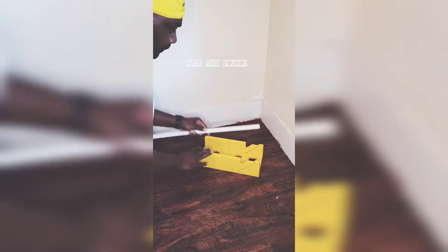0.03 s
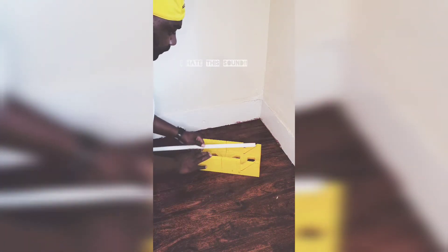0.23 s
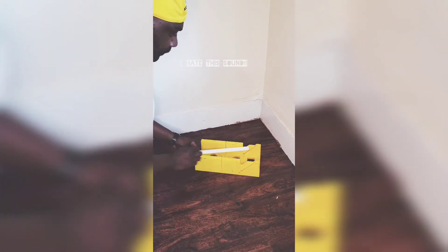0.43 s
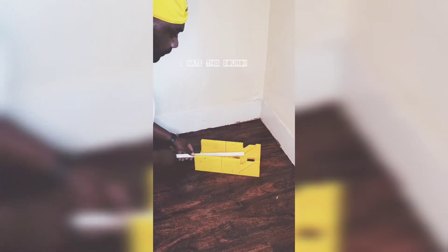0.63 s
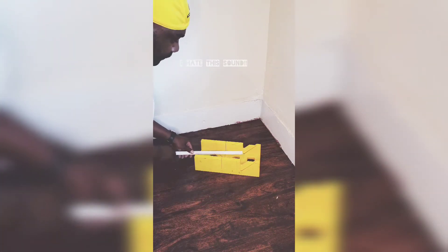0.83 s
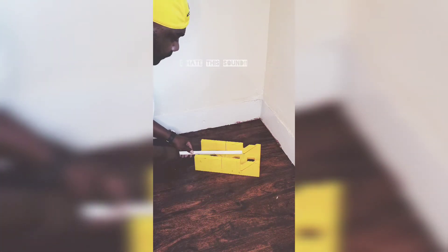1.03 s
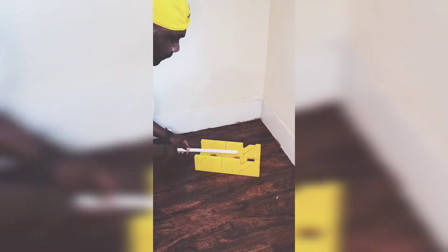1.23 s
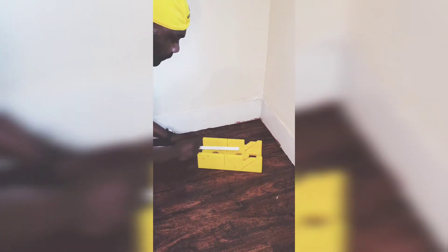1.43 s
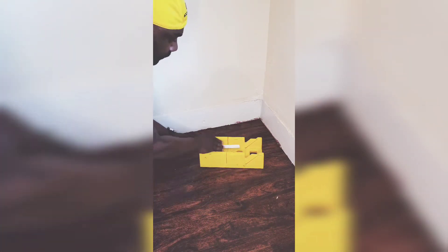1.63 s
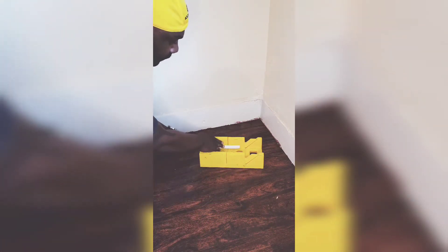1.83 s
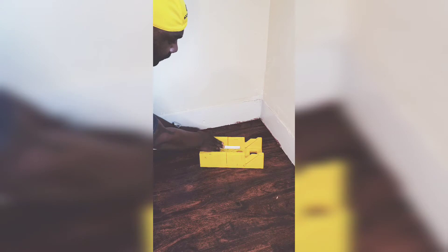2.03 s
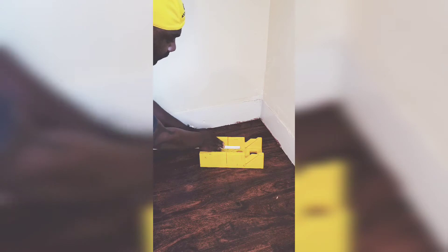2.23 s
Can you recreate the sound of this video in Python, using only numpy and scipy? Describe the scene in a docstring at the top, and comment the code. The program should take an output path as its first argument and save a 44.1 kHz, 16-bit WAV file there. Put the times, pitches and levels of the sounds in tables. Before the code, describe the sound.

Hand saw cutting trim in a hollow plastic box: ringing rasp, low judder, knocks, second rasping stroke

```python
"""A hand saw works through trim in a plastic miter box, on the floor of a bare room with a mains hum.
The first stroke hisses and rasps as shaped noise; the blade rings in its modes and squeals in pure tones.
As it slows the box judders low on the floor; meanwhile and shortly after, knocks of the blade in its slot,
as noise bursts, ring the box. A long stroke follows, ringing the blade in another, broader set of modes,
and a short faint scrape ends the scene. Hum harmonics and soft air noise run throughout."""
import sys
import numpy as np
from scipy import signal
from scipy.fft import rfft, irfft
from scipy.io import wavfile

SR = 44100
rng = np.random.default_rng(int(sys.argv[2]) if len(sys.argv) > 2 else 0)


def store_pcm(level_fs):
    """Save levels as 16-bit WAV."""
    pcm = np.round(np.clip(level_fs, -1, 1) * 32767).astype(np.int16)
    wavfile.write(sys.argv[1], SR, np.atleast_2d(pcm).T)


N = 100812

# Speed of the blade, as the level of its hiss. Each row: time in seconds, relative level in dB.
BLADE_SPEED = [(0.0, -56), (0.03, -57), (0.08, -47.5), (0.09, -50), (0.18, -45.5), (0.33, -44),
               (0.52, -59.5), (0.6, -54), (1.06, -83), (1.14, -64), (1.21, -60.5), (1.29, -67),
               (1.39, -49.5), (1.53, -46.5), (1.84, -74.5), (2.12, -82.5), (2.19, -59.5), (2.29, -58.5)]
# How hard the teeth bite, as the rasp in the box. Each row: time in seconds, relative level in dB.
BITE_LEVEL = [(0, -36.5), (.11, -41.5), (.19, -34.5), (.34, -33.5), (.46, -44.5), (.55, -41), (.63, -41.5),
              (.72, -43.5), (.86, -40), (1.05, -55), (1.17, -43), (1.29, -45.5), (1.38, -39.5), (1.5, -38),
              (1.58, -52), (1.67, -44.5), (1.82, -54.5), (1.94, -50.5), (2, -62.5), (2.13, -65),
              (2.19, -47), (2.29, -62)]
# Wood tearing under the teeth. Each row: time in seconds, relative level in dB.
TEAR_LEVEL = [(0, -38.5), (.2, -36), (.34, -35.5), (.5, -42), (.64, -40), (.76, -48.5), (1.06, -61),
              (1.14, -45.5), (1.29, -50.5), (1.34, -38.5), (1.45, -34.5), (1.51, -31), (1.57, -33.5),
              (1.65, -42.5), (1.74, -45), (1.84, -52.5), (2.12, -64), (2.18, -44.5), (2.29, -50)]
# Hollow ringing of the box under the saw. Each row: time in seconds, relative level in dB.
HOLLOW_LEVEL = [(0, -54), (.12, -44), (.23, -38.5), (.34, -43.5), (.48, -50), (.64, -42.5), (.76, -65),
                (.88, -49), (1.08, -58), (1.3, -57), (1.39, -41), (1.46, -37), (1.49, -30.5), (1.53, -32),
                (1.6, -39), (1.65, -46.5), (1.72, -45.5), (1.79, -54.5), (1.9, -62), (1.94, -47),
                (2.02, -65.5), (2.14, -63), (2.2, -54.5), (2.29, -63)]
# Rumble the strokes send into the floor. Each row: time in seconds, relative level in dB.
RUMBLE_LEVEL = [(0, -44), (.12, -42.5), (.2, -52), (.36, -45), (.5, -46.5), (.9, -61), (1.1, -58),
                (1.3, -62), (1.4, -51), (1.51, -43), (1.67, -44), (1.8, -58), (2.29, -60)]
# Ringing of the blade on the first stroke. Each row: time in seconds, relative level in dB.
FIRST_RING_LEVEL = [(0, -62), (.03, -27), (.06, -22.5), (.1, -27), (.14, -24.5), (.19, -26.5), (.26, -27),
                    (.33, -28.5), (.37, -36.5), (.48, -45), (.6, -51), (.9, -72)]
# Ringing of the blade on the long stroke. Each row: time in seconds, relative level in dB.
LONG_RING_LEVEL = [(1.28, -70), (1.332, -33.5), (1.4, -41), (1.46, -40), (1.5, -31), (1.56, -42.5),
                   (1.63, -53), (1.75, -69), (1.95, -99)]

# Modes of the blade on the first stroke. Each row: frequency in Hz, width in Hz, relative level in dB,
# time it takes hold in seconds, time it lets go in seconds.
FIRST_BLADE_MODES = [(2507, 18, -8, 0.036, 0.23), (2742, 12, -3.5, .04, 0.21), (2809, 19, 1.5, 0.13, 0.17),
                     (2926, 87, -3.5, 0.034, 0.3), (3142, 12, -2.5, 0.063, 0.29),
                     (3168, 27, 0.5, 0.046, 0.44), (3550, 7.5, -3.5, 0.086, 0.3), (3668, 8.2, -2, .16, .43),
                     (3667, 36, -9.5, 0.12, 0.36)]
# Broader modes of the blade on the long stroke. Each row: frequency in Hz, width in Hz,
# relative level in dB, time it takes hold in seconds, time it lets go in seconds.
LONG_BLADE_MODES = [(2502, 54, 1.5, 1.32, 1.4), (2814, 45, -0.5, 1.38, 1.44), (2850, 50, -3, 1.35, 1.58),
                    (3553, 45, 4.5, 1.48, 1.52), (3760, 39, -10, 1.6, 1.8)]
# Modes of the plastic box. Each row: frequency in Hz, width in Hz, relative level when sawn in dB,
# relative level when knocked in dB.
BOX_MODES = [(753, 24, -7, -7.5), (855.4, 27, -2, -20), (939.7, 38, 0.5, 1), (1004, 18, -8.5, 0.5),
             (1093, 40, -7, 2), (1270, 19.3, -2.5, 2), (1545, 58, -9, -12)]

# Squeals, where one blade mode takes over. Each row: middle in seconds, half length in seconds,
# frequency in Hz, level in dB, right ear against left in dB.
SQUEALS = [(0.061, .005, 3195, -23.5, -9), (0.0827, 0.0068, 3155, -6.5, -17.5),
           (0.115, 0.017, 3150, -16.5, -13.5), (0.187, 0.0041, 3675, -21, -4.5)]
# Knocks of the blade in its slot. Each row: start in seconds, relative level in dB, treble tilt in dB,
# decay time in seconds, relative level of the box ring in dB.
KNOCKS = [(0.594, -25, -3, 0.0084, -38.5), (.619, -40, -50, 0.0037, -36.5), (0.791, -29, 1, 0.014, -39.5),
          (1.208, -36, 0, .012, -36.5)]
# Low judder of the box on the floor. Each row: time in seconds, pitch in Hz, level in dB.
JUDDER = [(.48, 138, -110), (.53, 133, -62), (.57, 127, -41), (.61, 113.5, -37.5), (.645, 115, -34),
          (.68, 109, -33), (.712, 101, -49), (.74, 96, -37), (.785, 92, -51), (.84, 92, -110)]
# Harmonics of the hum. Each row: multiple of the mains pitch, level in dB.
HUM = [(1, -42), (2, -59), (3, -63), (4, -65), (5, -68), (6, -66), (7, -62)]

# Colour of the hiss. Each row: frequency in Hz, relative level in dB per Hz.
HISS_COLOUR = [(300, -21.5), (2000, -14), (4200, -22.5), (5200, 1.5), (6600, 10), (7400, 6.5), (8200, 2),
               (10000, 5), (12000, 7), (14000, 2.5), (16000, 4.5)]
# Colour of the tearing wood. Each row: frequency in Hz, relative level in dB per Hz.
WOOD_COLOUR = [(1000, -24), (2000, -9), (2300, -7.5), (2460, -4), (2650, -9.5), (2870, -3.5), (3200, -10),
               (3570, -7), (3900, -11.5), (4700, -13.5), (6500, -16.5), (9000, -32.5)]
# Colour of the rasp in the box. Each row: frequency in Hz, relative level in dB per Hz.
BOX_COLOUR = [(60, -13), (140, -9), (220, -8), (330, -5.5), (430, -4.5), (590, -4), (700, -1), (860, 1),
              (1050, -2), (1270, -4.5), (1400, -5), (1570, -2), (1850, -8), (2400, -15), (5000, -41.5)]
# Colour of the floor rumble. Each row: frequency in Hz, relative level in dB per Hz.
FLOOR_COLOUR = [(25, -30.5), (55, 18), (110, 5.5), (160, -2.5), (250, -8.5), (600, -44.5)]
# Colour of a knock before its treble tilt. Each row: frequency in Hz, relative level in dB per Hz.
KNOCK_COLOUR = [(80, -15.5), (300, -10.5), (650, -11.5), (1020, 0), (1170, -10.5), (1275, -4.5), (1400, 0),
                (1560, -2.5), (1900, -6), (2600, -4), (3300, -7.5), (4200, -14), (6000, -25.5), (9000, -40),
                (16000, -48)]
# Colour of the air of the room. Each row: frequency in Hz, relative level in dB per Hz.
AIR_COLOUR = [(20, -15.5), (45, -9), (90, -8), (150, -6), (300, -8), (600, -10.5), (1200, -14.5),
              (2500, -22.5), (5000, -38.5), (9000, -43), (16000, -54)]
# Decay of the room. Each row: frequency in Hz, time to fall by 60 dB in seconds.
ROOM_DECAY = [(100, 1), (400, 0.84), (1000, 0.58), (2800, 0.79), (6000, 0.7), (14000, 0.24)]

# Teeth: nominal rate at top speed, decay of one catch, spread of the catches, share of scraping, chatter
TEETH_PER_S, TOOTH_S, TOOTH_SPREAD_DB = 520, 0.00059, 3
SCRAPE_SHARE, CHATTER_DB = 0.74, 1.25
# Ringing: how fast blade modes take hold and let go, width of the skirt around each box mode
TAKE_HOLD_S, LET_GO_DB_PER_S, BOX_SKIRT_HZ = 0.0041, 73, 298
# Squeals: overtone level, wobble as a share of the pitch, echo level
OVERTONE_DB, SQUEAL_WOBBLE, SQUEAL_ECHO_DB = -25.5, 0.0067, -20
# Knocks: onset time of the box ring, corner of the treble tilt
KNOCK_RING_S, KNOCK_TILT_HZ = 0.0029, 1900
# Mains pitch, and phase skews added on the left and taken off on the right
MAINS_HZ, HUM_SKEW_RAD, JUDDER_SKEW_RAD = 58.6, 0.02, 0.11
# Mix trims
HISS_DB, AIR_DB, TAIL_DB, KNOCK_ROOM_DB = 6, -55.5, -5, -1
# Room: build-up time of the tail; corner of the stereo spread; top of the band
EARLY_S, MONO_HZ, EDGE_HZ = 0.0023, 562, 15850


def sawing():
    """The teeth hiss, tear the wood, shake the box, ring the blade and rumble in the floor."""
    drive, shake = teeth(), teeth()
    hiss = colour(drive, HISS_COLOUR) * amp(curve(BLADE_SPEED) + HISS_DB)
    wood = colour(teeth(), WOOD_COLOUR) * amp(curve(TEAR_LEVEL) - 3)
    rasp = colour(drive, BOX_COLOUR) * amp(curve(BITE_LEVEL) - 3.5)
    hollow = box_ringing(shake) * amp(curve(HOLLOW_LEVEL))
    steel = blade(shake, FIRST_BLADE_MODES, FIRST_RING_LEVEL)
    steel = steel + blade(shake, LONG_BLADE_MODES, LONG_RING_LEVEL)
    lean_left = amp(np.array([[0.93], [-0.93]]))
    close = hiss + wood + rasp + (hollow + steel) * lean_left
    rumble = colour(rng.standard_normal((2, N)), FLOOR_COLOUR) * amp(curve(RUMBLE_LEVEL))
    return narrow_bass(close + amp(TAIL_DB) * room(close) + rumble) * amp(-1.78)


def teeth():
    """Each tooth catches with a short burst over steady scraping; faster blade, more teeth."""
    # a power below 1 turns the wide range of hiss level into a smaller range of speed
    speed = amp(curve(BLADE_SPEED) - curve(BLADE_SPEED).max()) ** .3
    teeth_passed = np.cumsum(TEETH_PER_S * speed * np.exp(.3 * drift(150))) / SR
    strikes = np.diff(np.floor(teeth_passed), prepend=0) > 0
    catches = strikes * amp(TOOTH_SPREAD_DB * np.clip(rng.standard_normal(N), -2, 2))
    bursts = unit(signal.lfilter([1], [1, -np.exp(-1 / (TOOTH_S * SR))], catches))
    envelope = SCRAPE_SHARE + (1 - SCRAPE_SHARE) * bursts
    return unit(envelope * amp(CHATTER_DB * drift(44))) * rng.standard_normal((2, N))


def blade(drive, modes, level):
    """The rubbed steel rings in its modes, each taking hold and letting go at its own time."""
    t, out = np.arange(N) / SR, 0
    for hz, width_hz, db, start, end in modes:
        take_hold = (1 + np.tanh((t - start) / TAKE_HOLD_S)) / 2
        let_go = amp(-LET_GO_DB_PER_S * np.maximum(t - end, 0))
        out = out + amp(db) * unit(ring(drive, hz, width_hz)) * take_hold * let_go
    return out / np.linalg.norm(amp([row[2] for row in modes])) * amp(curve(level))


def box_ringing(drive):
    """The shaken plastic box rings in its modes, each narrow peak shaped by a wider one."""
    out = 0
    for hz, width_hz, sawn_db, _ in BOX_MODES:
        peak = ring(ring(drive, hz, width_hz), hz, BOX_SKIRT_HZ)
        out = out + amp(sawn_db) * unit(peak)
    return unit(out)


def squeals():
    """The blade sticks and slips at one mode: a nearly pure tone swells and fades."""
    t, out = np.arange(N) / SR, np.zeros((2, N))
    for middle, half, hz, db, right_db in SQUEALS:
        pitch = hz * (1 + SQUEAL_WOBBLE * drift(200))
        phase = 2 * np.pi * (np.cumsum(pitch) / SR + rng.random())
        tone = np.sqrt(2) * (np.sin(phase) + amp(OVERTONE_DB) * np.sin(2 * phase))
        swell = np.exp(-((t - middle) / half) ** 2)
        out += np.outer([1, amp(right_db)], tone * amp(db) * swell)
    return out + amp(SQUEAL_ECHO_DB) * room(out[:1] + out[1:])


def knocks():
    """Short noisy blows with sharp onsets ring the plastic box and the room."""
    t, out = np.arange(N) / SR, np.zeros((2, N))
    for start, db, treble_db, length, ring_db in KNOCKS:
        age = np.maximum(t - start, 0)
        blow = (t >= start) * np.exp(-age / length) * rng.standard_normal((2, N))
        tilted = [(hz, level + treble_db * hz ** 2 / (hz ** 2 + KNOCK_TILT_HZ ** 2))
                  for hz, level in KNOCK_COLOUR]
        out += amp(db) * colour(blow, tilted)
        for hz, width_hz, _, mode_db in BOX_MODES:
            # half the usual decay rate for this width, so a knock rings on longer
            envelope = (1 - np.exp(-age / KNOCK_RING_S)) * np.exp(-np.pi * width_hz * age / 2)
            tone = np.sin(2 * np.pi * (hz * age + rng.random((2, 1))))
            out += amp(ring_db + mode_db) * envelope * tone
    return narrow_bass(out + amp(KNOCK_ROOM_DB) * room(out))


def judder():
    """A low tone that sags as the stroke slows, its phase skewed between the ears."""
    phase = 2 * np.pi * np.cumsum(curve(JUDDER)) / SR + JUDDER_SKEW_RAD * np.array([[1], [-1]])
    return np.sqrt(2) * amp(curve(JUDDER, axis=2)) * np.sin(phase)


def background():
    """Slightly wavering mains hum, a stack of harmonics, and the air of the room as soft noise."""
    phase = 2 * np.pi * MAINS_HZ * np.arange(N) / SR + 0.1 * drift(4)
    phase = phase + HUM_SKEW_RAD * np.array([[1], [-1]])
    hum = sum(amp(db) * np.sin(k * phase + 2 * np.pi * rng.random()) for k, db in HUM)
    air = narrow_bass(colour(rng.standard_normal((2, N)), AIR_COLOUR))
    return np.sqrt(2) * hum * amp(0.5 * drift(8.7)) + amp(AIR_DB) * air


def room(x):
    """Diffuse tail of the bare room: decaying noise, each band dying at its own speed."""
    hz, t, bands = signal.stft(rng.standard_normal((2, SR)), SR, nperseg=256)
    decay = amp(-60 * t / read(ROOM_DECAY, hz)[:, None])
    tail = signal.istft(bands * decay, SR, nperseg=256)[1]
    tail = tail * (1 - np.exp(-np.arange(tail.shape[1]) / SR / EARLY_S))
    return signal.fftconvolve(x, tail / np.linalg.norm(tail[0]), axes=1)[:, :N]


def narrow_bass(x):
    """Two close microphones hear the same bass: the side signal fades out towards low pitch."""
    f = np.fft.rfftfreq(x.shape[1], 1 / SR)
    apart = f ** 2 / (f ** 2 + MONO_HZ ** 2)
    mid = rfft(x[0] + x[1]) * np.sqrt(2 - apart)
    side = rfft(x[0] - x[1]) * np.sqrt(apart)
    return irfft(np.array([mid + side, mid - side]), x.shape[1]) / 2


def ring(x, hz, width_hz):
    """One mode driven by x: a resonator with a single complex pole."""
    pole = np.exp((2j * np.pi * hz - np.pi * width_hz) / SR)
    return signal.lfilter([1], [1, -pole], x).real


def colour(x, points, size=4096):
    """Causal minimum-phase filter of energy 1 with the given spectrum."""
    log_gain = np.log(amp(read(points, abs(np.fft.fftfreq(size, 1 / SR)))))
    taps = np.fft.ifft(np.exp(np.conj(signal.hilbert(log_gain)))).real[:size // 2]
    return signal.oaconvolve(x, taps[None] / np.linalg.norm(taps), axes=1)[:, :N]


def drift(hz):
    """Random wander of rms 1: noise with a soft low-pass around hz."""
    f = np.fft.rfftfreq(N, 1 / SR)
    return unit(irfft(rfft(rng.standard_normal(N)) * np.exp(-(f / hz) ** 2), N))


def curve(rows, axis=1):
    """One column of a time table, at every sample."""
    rows = np.array(rows)
    return np.interp(np.arange(N) / SR, rows[:, 0], rows[:, axis])


def read(points, hz):
    """A frequency table read on a log-frequency axis."""
    f, value = np.transpose(points)
    return np.interp(np.log(hz + 1), np.log(f + 1), value)


def amp(db):
    """Decibels to amplitude."""
    return 10 ** (np.asarray(db) / 20)


def unit(x):
    """Scales to rms 1."""
    return x / np.sqrt(np.mean(x ** 2) + 1e-20)


def scene():
    """Everything heard at the two microphones."""
    return sawing() + squeals() + knocks() + judder() + background()


def record(dry):
    """The recorder's band limit: a steep low-pass at the top of the treble."""
    low_pass = signal.firwin(511, EDGE_HZ, window=("kaiser", 9), fs=SR)
    return signal.oaconvolve(dry, low_pass[None], "same")


dry = scene()
out = record(dry)
store_pcm(out)
```